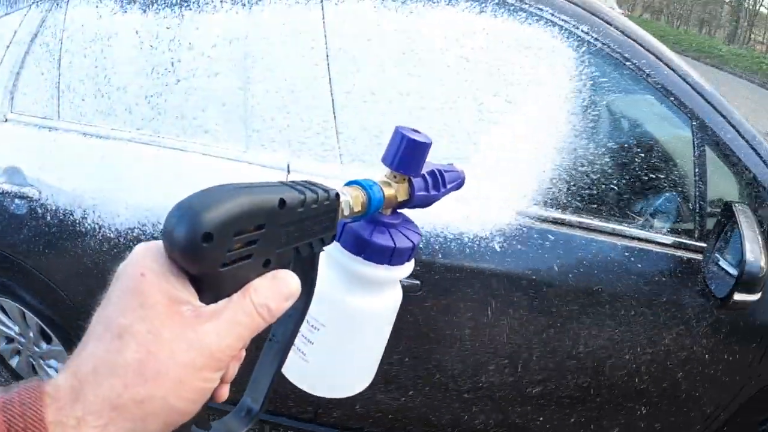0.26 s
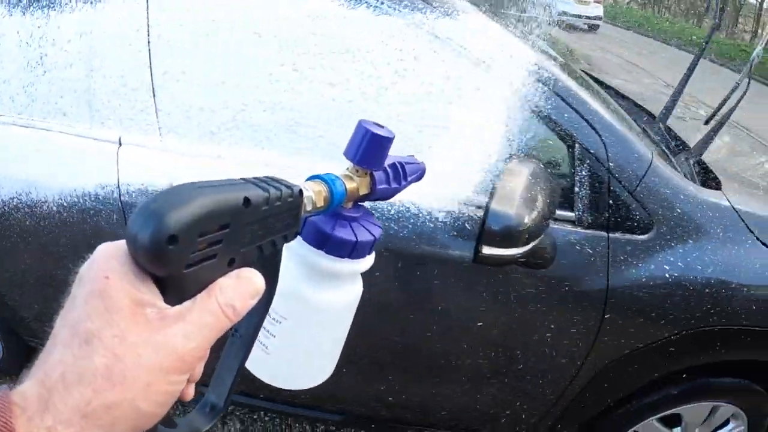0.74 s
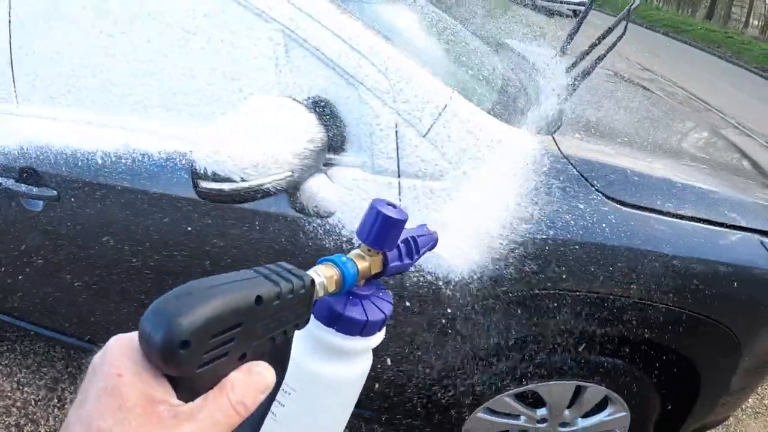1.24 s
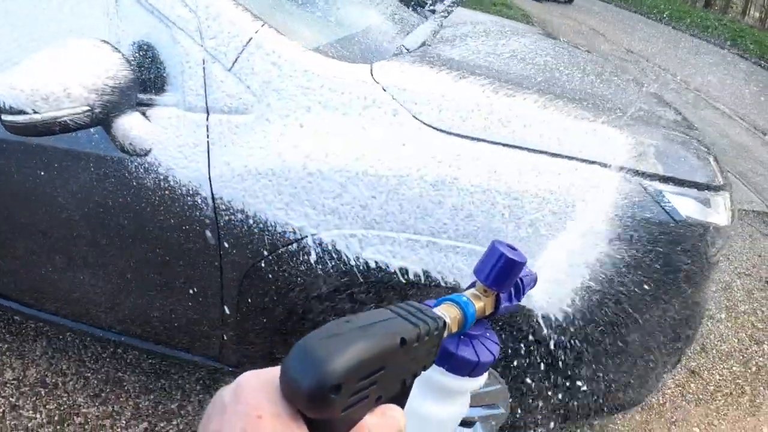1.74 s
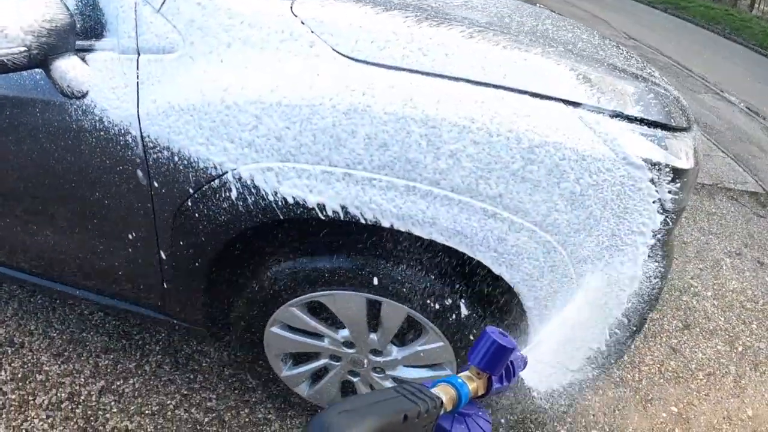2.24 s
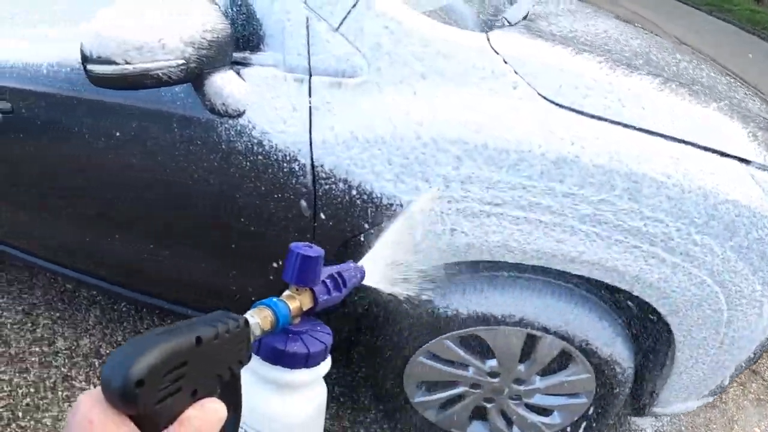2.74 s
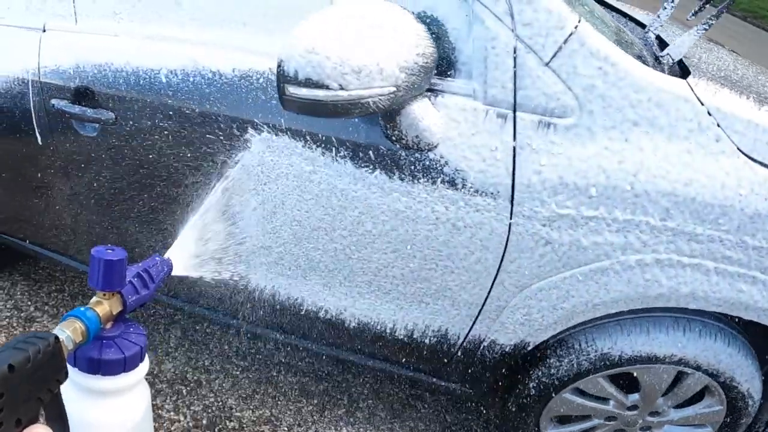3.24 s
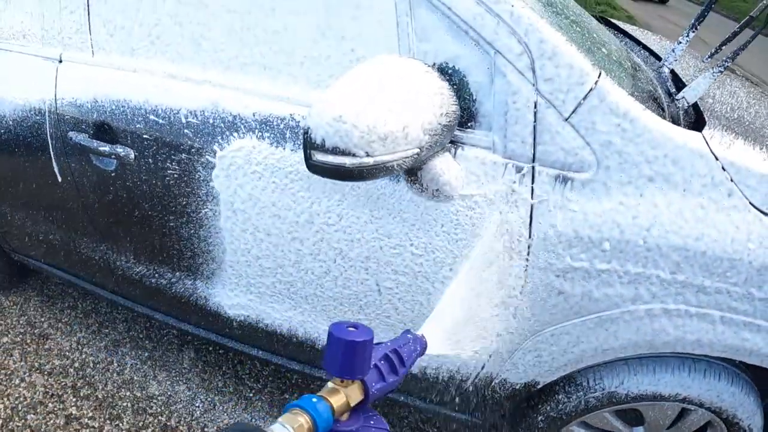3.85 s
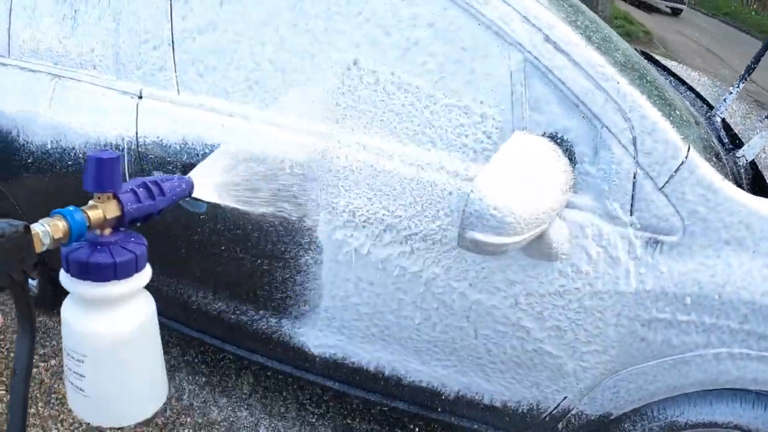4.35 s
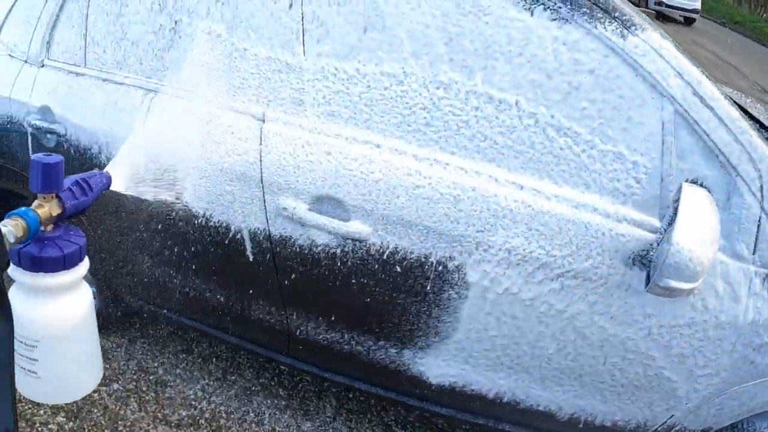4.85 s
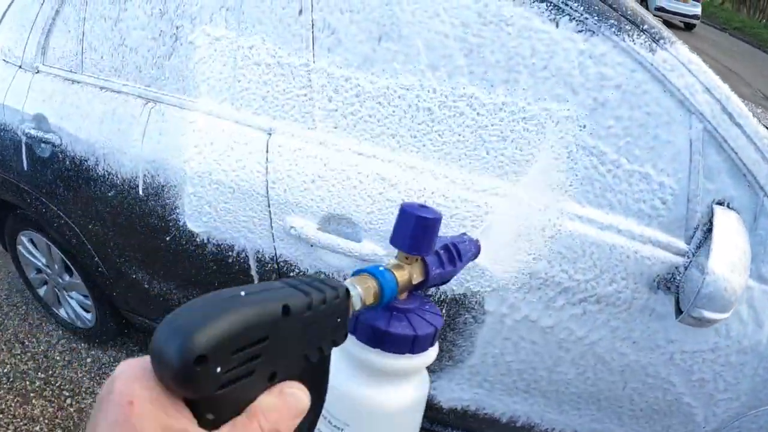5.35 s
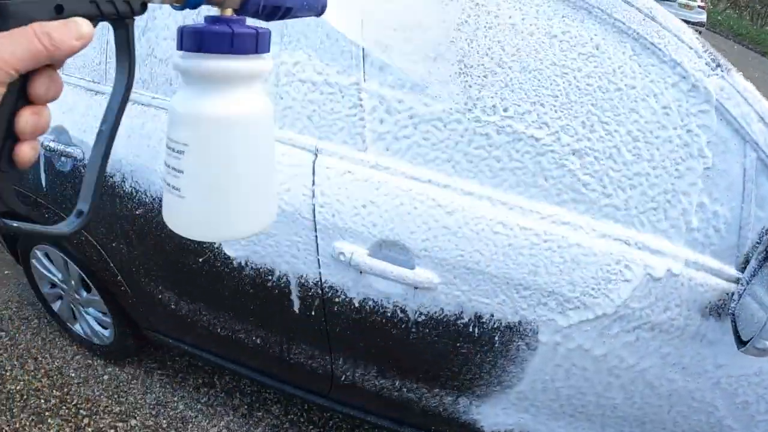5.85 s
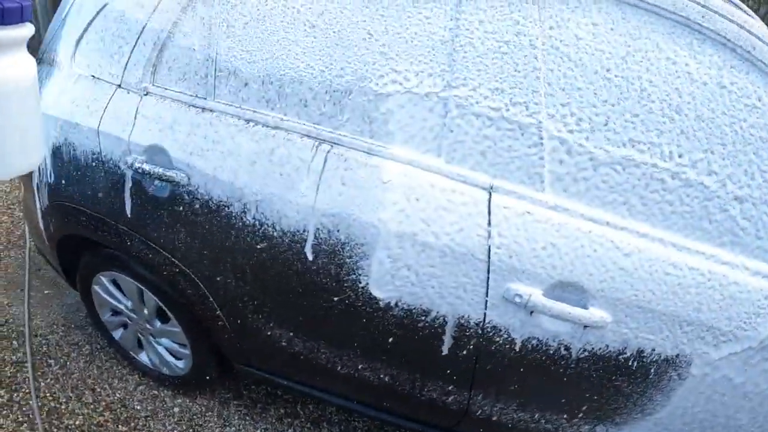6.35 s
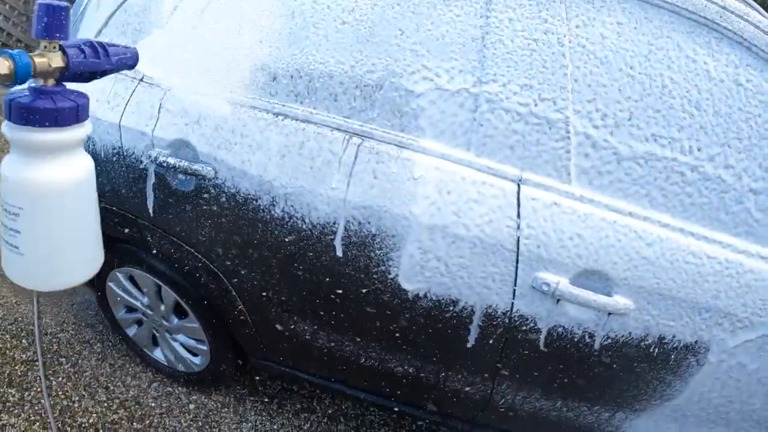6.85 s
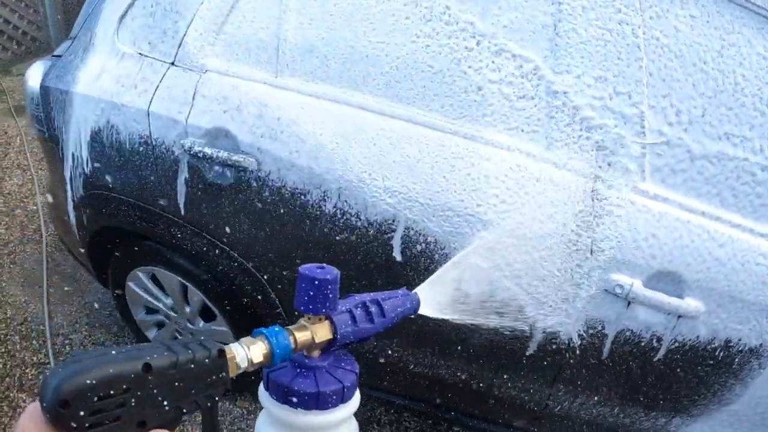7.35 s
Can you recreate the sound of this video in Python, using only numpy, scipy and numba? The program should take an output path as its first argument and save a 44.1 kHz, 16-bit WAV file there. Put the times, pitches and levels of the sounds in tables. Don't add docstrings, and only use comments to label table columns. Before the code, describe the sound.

Steady pressure-washer foam spray, close and nearly mono, running without a break. Airy whistling sits inside the hiss, with crisp mist above and dull panel drumming below. Wind thumps and flutters heavily in the first few seconds, then calms, letting a distant motor hum through. Short reflections from the car make the hiss hollow and sliding; a last gust rises near the end.

```python
import sys
import numpy as np
from scipy import signal
from scipy.fft import rfft, irfft
from scipy.io import wavfile
from scipy.ndimage import uniform_filter1d, map_coordinates
from numba import njit

SR = 44100
rng = np.random.default_rng(int(sys.argv[2]) if len(sys.argv) > 2 else 0)


def ratio(d):
    e = np.asarray(d, float) / 20
    return 10 ** e


def store_pcm(level_fs):
    pcm = np.round(np.clip(level_fs, -1, 1) * 32767).astype(np.int16)
    wavfile.write(sys.argv[1], SR, np.atleast_2d(pcm).T)


N = 335160
TIME = np.arange(N) / SR


def level(x, db):
    return x * ratio(db) / np.sqrt(np.mean(x ** 2))


def columns(table):
    s, *rest = np.transpose(table)
    return [np.interp(TIME, s, column) for column in rest]


def bumps(middle_s, length_s, db):
    total_db = 0
    for middle, length, peak_db in zip(middle_s, length_s, db):
        phase = np.clip((TIME - middle) / length, -.5, .5)
        total_db = total_db + peak_db * np.cos(np.pi * phase) ** 2
    return total_db


def colour(x, spectrum, skirt_db):
    hz, db = np.transpose(spectrum)
    octave, points = np.log2(np.fft.rfftfreq(N, 1 / SR) + .1), np.log2(hz)
    beyond = np.abs(octave - np.clip(octave, points[0], points[-1]))
    gain = ratio(np.interp(octave, points, db) - skirt_db * beyond)
    return level(irfft(rfft(x) * gain, N), 0)


@njit
def moving_band(x, centre_hz, width_hz):
    y, band, low = np.empty(len(x)), 0., 0.
    for i in range(len(x)):
        g, k = np.tan(np.pi * centre_hz[i] / SR), width_hz / centre_hz[i]
        v = (band + g * (x[i] - low)) / (1 + g * (g + k))
        band, low, y[i] = 2 * v - band, low + 2 * g * v, k * v
    return y


def walk(rate_hz):
    hold = int(SR / rate_hz)
    steps = np.repeat(rng.standard_normal(N // hold + 1), hold)
    return level(uniform_filter1d(uniform_filter1d(steps, hold), hold)[:N], 0)


def turbulence(sputter_db, rate_hz):
    return ratio(sputter_db * walk(rate_hz)) * rng.standard_normal(N)


def echo(sound, lag_ms, db):
    at = np.arange(N) - uniform_filter1d(lag_ms, size=2500) * SR / 1000
    return ratio(db) * map_coordinates(sound, [at], order=1, mode="reflect")


# (frequency [Hz], density [dB per Hz])
HEAVE_SPECTRUM = [(1, -42), (3, -3), (6, -2), (11, -8), (18, -18.5), (24, -43)]
# (frequency [Hz], density [dB per Hz])
FLUTTER_SPECTRUM = [(24, 9), (32, 7), (45, -9), (58, -15), (76, -13.5), (98, -22.5), (118, -23), (135, -27)]
# (middle [s], length [s], rise above the calm [dB], extra reach above 60 Hz [dB])
GUSTS = [(0.144, 0.4, 22, 2), (0.462, 0.43, 21, 5), (0.774, 0.7, 25, 3), (1.17, 0.77, 20, -8),
         (1.597, 1, 17, -1), (1.86, 0.64, 10, 5), (2.09, 0.33, 20, 0), (2.54, 0.51, 8, 5),
         (2.83, 0.39, 14, -1), (3.304, 0.94, 10.5, 17), (3.697, 0.62, 21, 0), (5.15, 0.27, 9, -6),
         (7.3, 0.71, 12, 5), (7.6, .12, 7, 0)]


def wind():
    middle_s, length_s, rise_db, extra_db = np.transpose(GUSTS)
    above_db = bumps(middle_s, length_s, rise_db)
    heave_db = -34.3 + 0.43 * above_db
    flutter_db = -63.4 + above_db
    reach_db = -7 - 0.57 * above_db + bumps(middle_s, length_s, extra_db)
    heave = colour(rng.standard_normal(N), HEAVE_SPECTRUM, skirt_db=42)
    gust = turbulence(1.5, 20)
    low = colour(gust, FLUTTER_SPECTRUM[:4], skirt_db=30)
    high = colour(gust, FLUTTER_SPECTRUM[4:], skirt_db=18)
    return ratio(heave_db) * heave + ratio(flutter_db) * (low + ratio(reach_db) * high)


# (multiple of the shaft rate [ratio], level [dB])
PUMP_TONES = [(3, -71), (4, -75), (4.5, -69), (5, -66), (6, -64), (7, -66), (8, -69), (9, -69),
              (10, -73), (12, -70)]


def pump():
    shaft_hz = 66.6 * (1 + 0.00227 * walk(2))
    turns = np.cumsum(shaft_hz) / SR
    hum = 0
    for multiple, db in PUMP_TONES:
        waver = ratio(2.4 * walk(3))
        hum = hum + level(waver * np.sin(2 * np.pi * (multiple * turns + rng.random())), db)
    return hum


# (frequency [Hz], density [dB per Hz])
PANEL_SPECTRUM = [(88, -41), (150, -16), (270, -7), (339, -1.5), (403, -5), (434, -0.5), (775, -1),
                  (928, -3), (1380, -4.5), (1450, -7), (1880, -21), (3190, -120)]


def panels():
    return level(colour(turbulence(0.13, 10), PANEL_SPECTRUM, skirt_db=18), -45.8)


# (start [s], length [s])
SPREAD_SPELLS = [(0.04, 0.23), (0.32, 0.05), (0.42, 0.18), (0.95, 0.09), (1.1, 0.05), (1.82, 0.09),
                 (1.96, 0.43), (2.93, 0.04), (3.01, 0.25), (3.29, 0.07), (3.46, 0.14), (3.98, 0.04),
                 (4.09, 0.15), (4.54, 0.06), (4.66, 0.1), (4.81, 0.31), (5.31, 0.45), (6.25, 0.37),
                 (6.65, 0.14), (7.22, 0.35)]


def spread():
    gain = sum(ratio(-63.5) * ((TIME > s) & (TIME < s + length)) for s, length in SPREAD_SPELLS)
    rumble = colour(rng.standard_normal(N), PANEL_SPECTRUM[:-3], skirt_db=30)
    patch = moving_band(rumble, 500 * 2 ** (.7 * walk(25)), 500.)
    return uniform_filter1d(gain, size=600) * ratio(3 * walk(20)) * level(patch, 0)


# (time [s], extra path [ms], level [dB])
FLANK_ECHO = [(0, 2.36, -16), (.55, 2.29, -17), (.95, 2.62, -13), (1.55, 1.82, -14), (2.1, 1.72, -8),
              (2.43, 1.77, -9), (2.78, 1.59, -10), (3.35, 2.01, -11), (3.7, 2.03, -13), (4.2, 2.29, -19),
              (4.86, 2.6, -14), (5.28, 2.34, -15), (5.5, 2.51, -12), (6.05, 2.24, -8), (6.55, 2.77, -12),
              (6.9, 2.7, -14), (7.32, 2.58, -16), (7.6, 2.25, -18)]
# (time [s], extra path [ms])
GROUND_BOUNCE = [
    (0, 6.4),
    (.8, 6.7),
    (1.5, 5.5),
    (1.9, 4.2),
    (2.2, 4),
    (2.8, 4.8),
    (3.5, 5.3),
    (4.6, 6.1),
    (6.8, 7),
    (7.6, 6.6),
]


def flank(sound):
    lag_ms, echo_db = columns(FLANK_ECHO)
    dull = signal.sosfiltfilt(signal.butter(1, 5000, fs=SR, output="sos"), sound)
    side = echo(dull, lag_ms - .015, echo_db + 6)
    ground = echo(dull, *columns(GROUND_BOUNCE), -17)
    glints = 0
    for path_ms in (.5, .9, 3.6, 5, 8, 11):
        glints = glints + echo(sound, path_ms * (1 + .06 * walk(2)), -22 + 4 * walk(4))
    return side + ground + glints


# (middle [s], length [s], centre [Hz], lift [dB])
HOLLOWS = [(0, 0.22, 3280, 4), (.4, 0.34, 3100, 4), (0.97, 0.76, 3080, 6.5), (1.243, 0.54, 3900, 1.5),
           (2, 0.19, 2860, 4), (2.727, 1, 3500, 5.5), (3.562, 0.2, 3100, 6), (3.9, 0.59, 3400, 2.5),
           (4.194, 0.13, 3500, 6), (4.55, 0.68, 3200, 1), (4.99, 0.51, 3520, 5), (5.253, 0.2, 3150, 5),
           (7.16, 0.35, 3070, 2), (7.494, 1, 2950, 5.5)]
# (middle [s], length [s], from [Hz], to [Hz], depth [dB])
SHADOWS = [
    (.4, .35, 2550, 2550, -5),
    (1.09, .22, 2000, 4700, -15),
    (2.9, .3, 2650, 2600, -8),
    (3.11, .1, 2500, 4300, -14),
]


def passing(jet):
    middle_s, length_s, hz, lift_db = np.transpose(HOLLOWS)
    lift = ratio(bumps(middle_s, length_s, lift_db)) - 1
    jet = jet + lift * moving_band(jet, np.interp(TIME, middle_s, hz), 420.)
    middle_s, length_s, from_hz, to_hz, depth_db = np.transpose(SHADOWS)
    ends_s = np.ravel([middle_s - length_s / 2, middle_s + length_s / 2], "F")
    glide_hz = np.interp(TIME, ends_s, np.ravel([from_hz, to_hz], "F"))
    cut = ratio(bumps(middle_s, length_s, depth_db)) - 1
    return jet + cut * moving_band(jet, glide_hz, 380.)


# (frequency [Hz], density [dB per Hz])
MIST_SPECTRUM = [(4000, -52), (6800, -5.5), (8520, 0.5), (10300, -8.5), (13400, -2.5), (15600, -9.5)]
# (time [s], aim [dB])
AIM = [(0.0, -38), (1.69, -37), (2.2, -42.5), (2.64, -34.5), (3.2, -35.5), (3.49, -39.5), (3.62, -37.5),
       (4.59, -35), (4.99, -44.5), (5.16, -37.5), (5.57, -39.5), (5.82, -35.5), (6.29, -36.5),
       (6.33, -39.5), (6.9, -45.5), (7.01, -38.5), (7.51, -40), (7.6, -37)]
# (middle [s], length [s], level change [dB])
SWALLOW = [
    (.97, 0.34, -3),
    (4.218, 0.14, -3),
    (7.105, 0.22, -1),
]


def mist():
    aim_db = columns(AIM)[0]
    aim_db = aim_db - np.mean(aim_db)
    drops = ratio(1.45 * walk(2500))
    fizz = colour(drops * turbulence(0.3, 40), MIST_SPECTRUM, skirt_db=5)
    top = signal.sosfiltfilt(signal.butter(2, 9700, "high", fs=SR, output="sos"), fizz)
    fizz = fizz - top + top * ratio(0.68 * aim_db + 0.22 * walk(90))
    return ratio(-37.5 + 0.39 * aim_db + bumps(*np.transpose(SWALLOW))) * fizz


# (frequency [Hz], density [dB per Hz])
JET_SPECTRUM = [(1350, -11.5), (2300, 0), (2520, 2), (3550, 1.5), (4820, -2), (5600, 0), (6350, -6.5),
                (6800, -7.5), (8840, -11.5), (15000, -120)]
# (time [s], chamber pitch [Hz], whistle level [dB], jet level [dB])
CHAMBER = [(0, 1950, -34, -33), (.3, 1870, -35, -33), (.7, 1925, -34.5, -32.5), (1, 1934, -32, -34),
           (1.37, 1925, -32.5, -33.5), (1.6, 1900, -35.5, -33.5), (2.1, 1900, -34, -33.5),
           (2.5, 1926, -32.5, -33), (2.85, 1930, -37.5, -34), (3.4, 1974, -33.5, -32.5),
           (4.15, 1960, -34.5, -32), (4.55, 1910, -36.5, -33), (5.15, 1914, -32, -32.5),
           (5.55, 1960, -33, -32), (5.85, 1946, -36, -32.5), (6.4, 1940, -34.5, -34.5), (7, 1940, -34, -32),
           (7.6, 1944, -33.5, -33)]


def lance():
    pitch_hz, whistle_db, jet_db = columns(CHAMBER)
    whistle = moving_band(moving_band(turbulence(1.2, 12), pitch_hz, 165.), pitch_hz, 800.)
    jet = passing(colour(turbulence(.6, 8), JET_SPECTRUM, skirt_db=30))
    return ratio(whistle_db - 0.55) * level(whistle, 0) + ratio(jet_db) * jet + mist()


def scene():
    spray = lance()
    mid = wind() + pump() + panels() + flank(spray) + spray
    side = spread()
    return np.array([mid + side, mid - side])


def band_limit(x):
    return signal.sosfilt(signal.butter(12, 15710, fs=SR, output="sos"), x)


def record(dry):
    return band_limit(dry)


dry = scene()
out = record(dry)
store_pcm(out)
```